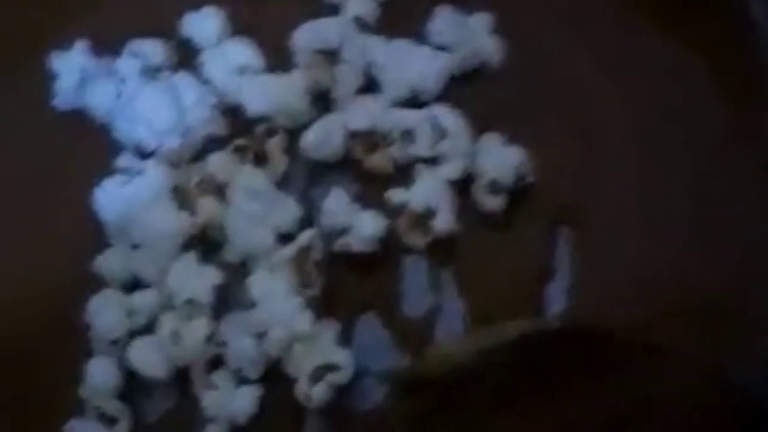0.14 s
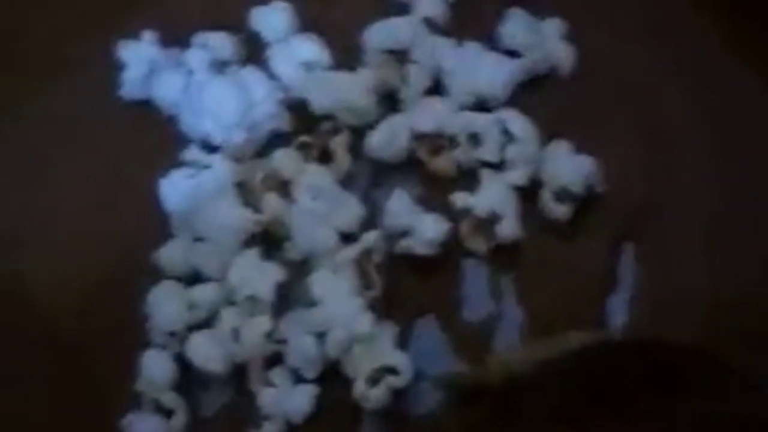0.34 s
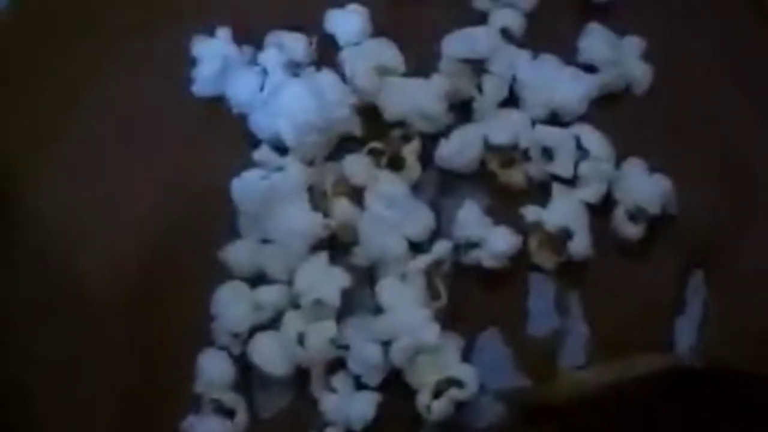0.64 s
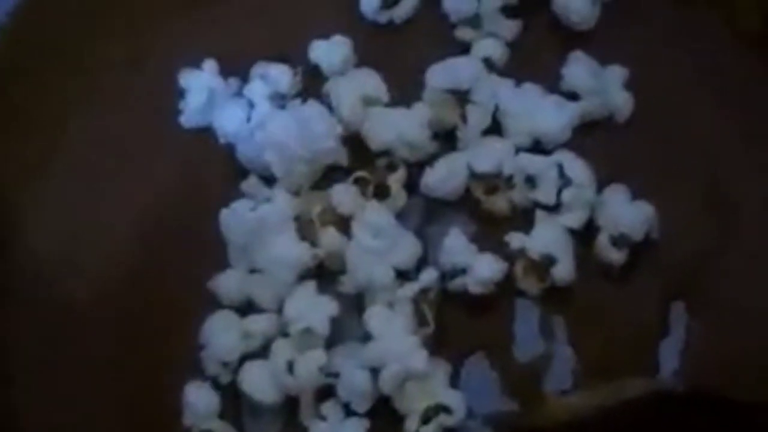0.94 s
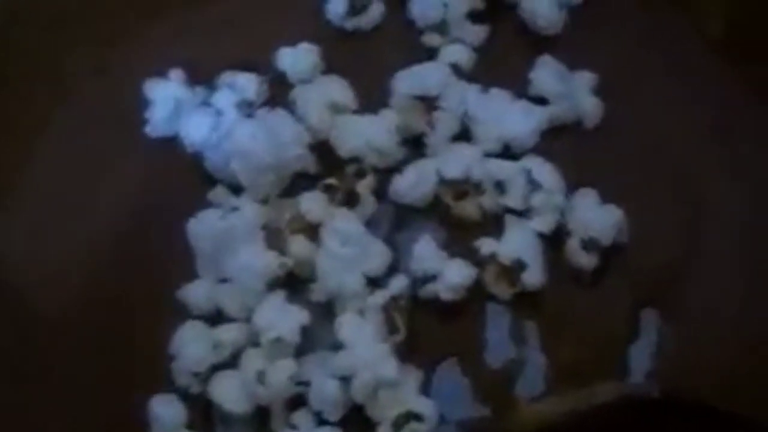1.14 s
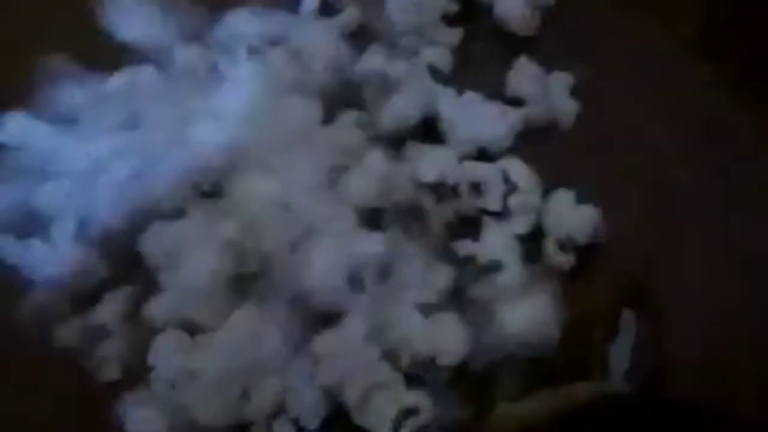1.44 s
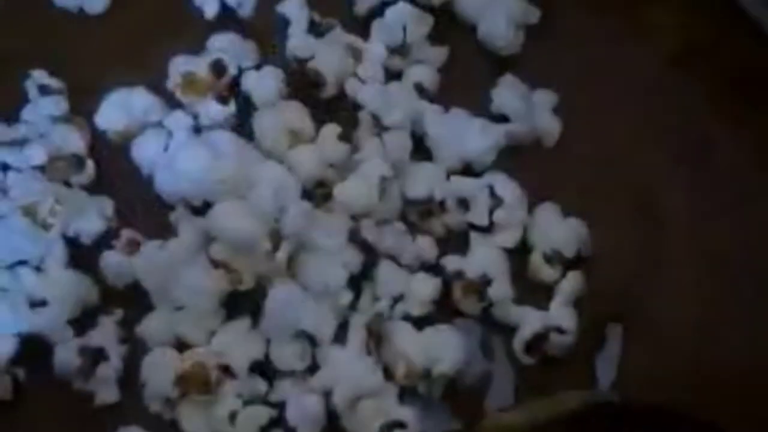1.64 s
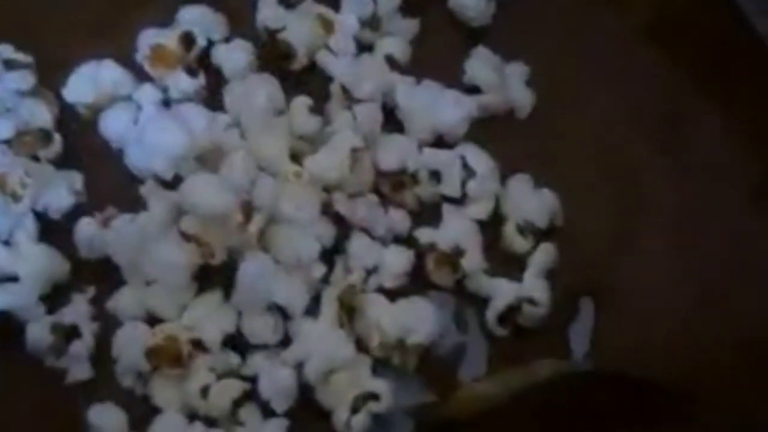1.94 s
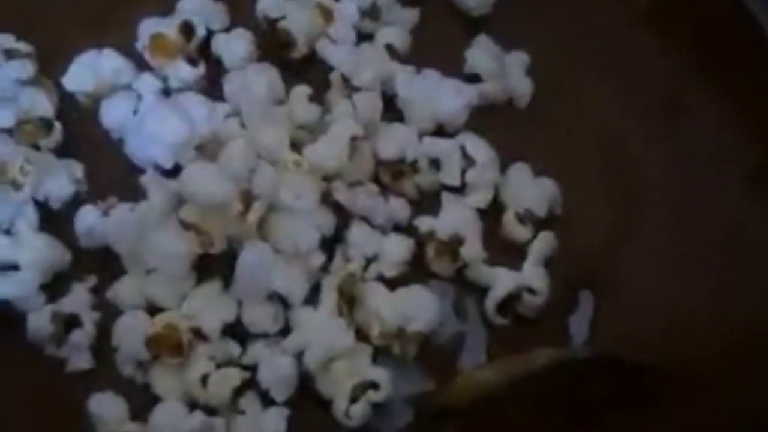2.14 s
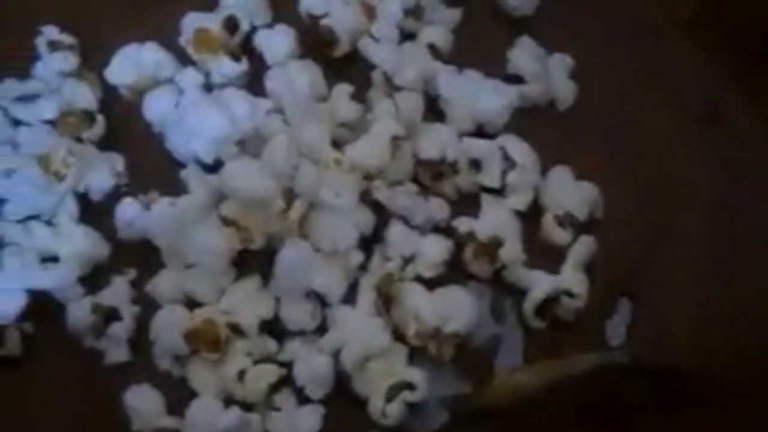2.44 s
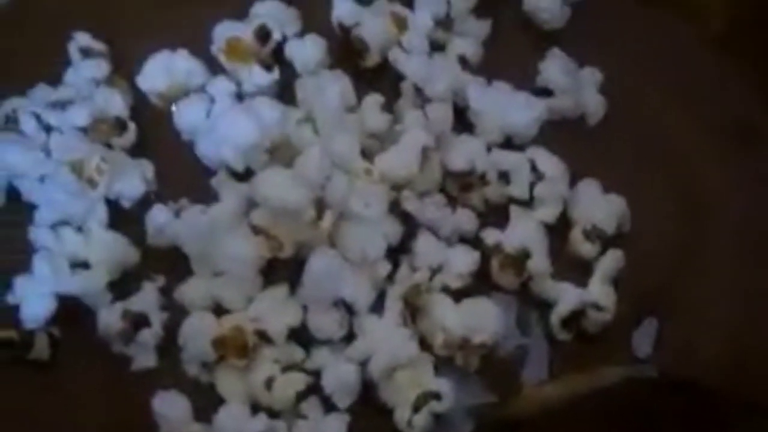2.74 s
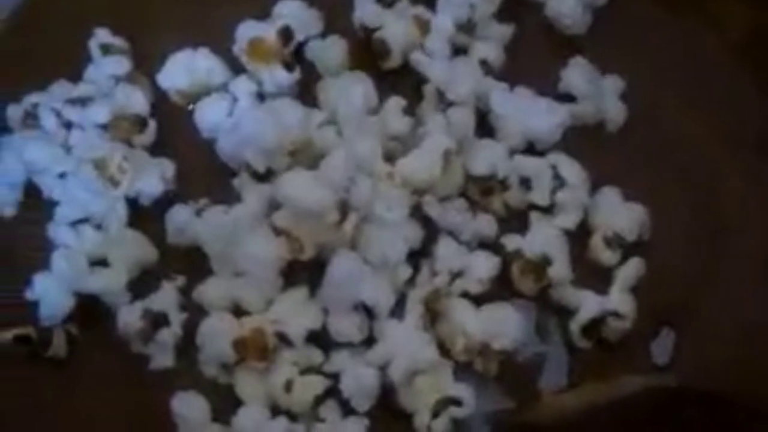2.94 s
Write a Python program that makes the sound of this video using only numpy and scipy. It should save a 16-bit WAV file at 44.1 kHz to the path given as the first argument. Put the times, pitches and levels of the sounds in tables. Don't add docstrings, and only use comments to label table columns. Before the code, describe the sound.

Popcorn and hard kernels rattle, click and scrape in a thin metal pot, a heap thumps softly into a hollow bowl, then a second rattle follows; quiet kitchen, close, dull, hissy small microphone.

```python
import sys
import numpy as np
from scipy import signal
from scipy.fft import rfft, irfft
from scipy.io import wavfile
from scipy.ndimage import uniform_filter1d

SR = 44100
rng = np.random.default_rng(int(sys.argv[2]) if len(sys.argv) > 2 else 0)


def transcribe(signal):
    frames = np.atleast_2d(signal).T
    limited = np.clip(frames, -1, 1)
    pcm = np.round(limited * 32767).astype(np.int16)
    wavfile.write(sys.argv[1], SR, pcm)


def ratio_of_db(decibels):
    return 10 ** (np.asarray(decibels, float) / 20)


N = 136710

# t/s, wall rattle level/dB, belly drag level/dB
SHAKING_PASSES = [
    [(.13, -72, -75), (.17, -59.5, -78), (.25, -51.5, -53), (.44, -53.5, -51), (.7, -55.5, -54),
     (.94, -56.5, -59.5), (1.02, -65.5, -60), (1.12, -70.5, -65), (1.35, -70.5, -79)],
    [(1.87, -81, -87), (1.92, -59.5, -62), (2.03, -57.5, -63), (2.2, -57.5, -62), (2.37, -53, -65),
     (2.5, -49, -43.5), (2.68, -56.5, -57), (2.86, -66.5, -60.5), (3.0, -87, -76.5)],
]
# t/s, peak level/dB, belly share/dB, chatter length/s, spot pitch f/Hz
KERNEL_STRIKES = [(0.166, -41.5, -10, 0.025, 4600), (0.198, -41.5, -3, 0.028, 3660),
                  (0.237, -39.5, 4.5, 0.049, 2370), (0.2666, -26, -7, 0.01, 2310),
                  (0.289, -29, -1.5, 0.012, 2360), (0.327, -43, 8, 0.021, 4500),
                  (0.3813, -34, 0, 0.025, 6500), (0.411, -33.5, -2.5, 0.019, 5100),
                  (0.5048, -35.5, -1.5, 0.041, 6230), (0.5754, -33, -10, 0.004, 6260),
                  (0.584, -37, -24, 0.0064, 6200), (0.604, -31, -8.5, 0.01, 2170),
                  (0.6227, -30.5, -2.5, 0.0056, 6130), (0.743, -41.5, -12, 0.022, 2330),
                  (0.769, -37, -11, 0.0049, 6300), (0.8626, -31.5, -5, 0.015, 6460),
                  (0.87, -30, -8, 0.015, 5260), (0.897, -33.5, -4.5, 0.035, 4650),
                  (1.038, -36.5, -2.5, 0.028, 5370), (1.095, -51.5, -5, 0.017, 4470),
                  (1.896, -49, -23, 0.028, 6100), (1.918, -43.5, -17, 0.03, 5250),
                  (1.941, -38, -9.5, 0.029, 3600), (1.986, -38, -1.5, 0.018, 4700),
                  (2.045, -38.5, -3.5, 0.023, 4840), (2.0654, -33.5, -13.5, 0.024, 4700),
                  (2.101, -32, -14.5, 0.0082, 4530), (2.145, -35.5, -4.5, 0.016, 6360),
                  (2.174, -40, -7.5, 0.029, 4600), (2.2343, -41.5, 2.5, 0.024, 2340),
                  (2.411, -37.5, -9, 0.021, 2330), (2.469, -36.5, 5, 0.016, 6420),
                  (2.503, -42, 0, 0.012, 4470), (2.54, -34.5, 1, 0.0026, 3460),
                  (2.5483, -27, -6.5, 0.016, 5400), (2.6292, -31, -9.5, 0.003, 5200),
                  (2.634, -32.5, -29, 0.0046, 5500), (2.7282, -36.5, 0.5, 0.003, 4000),
                  (2.779, -28, -10, 0.013, 5570), (2.788, -31, -12, 0.013, 5760)]
# t/s, peak level/dB, thud share/dB, thud pitch f/Hz, belly pitch f/Hz
BELLY_KNOCKS = [(.157, -53.5, -15, 253, 1150), (.222, -43.5, -13.5, 283, 1140),
                (.264, -31, -8.5, 258, 1040), (.27, -24.5, -21, 254, 1700), (.278, -33, -6.5, 262, 1050),
                (.29, -36, -4, 258, 1000), (.3, -38.5, -12, 250, 620), (.355, -37, -12.5, 258, 1020),
                (.43, -51, -0.5, 256, 625), (.83, -38.5, -46, 400, 840), (.915, -36.5, -18, 160, 1050),
                (.935, -38.5, -12.5, 160, 620), (1.9, -65, -26, 400, 1170), (2.07, -57.5, -5, 165, 684),
                (2.305, -47, -6, 316, 620), (2.392, -31, -10.5, 253, 1190), (2.4, -33, -12, 292, 573),
                (2.472, -43.5, -12, 163, 672), (2.545, -40, -8, 300, 1630),
                (2.592, -34.5, -23.5, 300, 1080), (2.62, -35.5, -23, 160, 620),
                (2.665, -36, -17, 300, 1080), (2.675, -37.5, -27, 400, 535), (2.79, -39.5, -25, 253, 626),
                (2.838, -42.5, -18, 307, 690)]
# t/s, peak level/dB, crackle share/dB, spot pitch f/Hz
BOWL_DROPS = [(.0985, -48.5, -34, 1440), (.101, -48.5, -34, 480), (.125, -58, -22, 1020),
              (1.434, -51, -4, 910), (1.443, -44, -6, 2500), (1.456, -38, -5, 1870),
              (1.464, -34, -12.5, 920), (1.468, -34, -28, 1390), (1.474, -37, -8, 920),
              (1.487, -36, -11, 910), (1.511, -40.5, -20, 940), (1.547, -45.5, -17, 1410),
              (1.567, -55, -8, 865), (1.612, -57, -22, 492), (1.653, -58.5, -7, 1400)]
# t/s, level/dB
HUM_LEVEL = [
    (.2, -83),
    (.45, -60),
    (1.1, -63),
    (1.3, -77.5),
    (1.9, -84),
    (1.97, -58),
    (2.33, -55),
    (2.93, -64.5),
    (2.97, -92),
]
# t/s, level/dB
AIR_NOTE_LEVEL = [
    (1.44, -70),
    (1.449, -44),
    (1.464, -43),
    (1.468, -54),
    (1.482, -43),
    (1.487, -54),
    (1.493, -44),
    (1.545, -53),
    (1.585, -72),
]
# t/s, level/dB
HAND_LEVEL = [
    (.1, -89),
    (.42, -67.5),
    (.6, -87),
    (.9, -92),
    (.95, -65),
    (1.02, -80),
    (2.34, -95),
    (2.4, -63),
    (3.05, -84),
]
# t/s, length/s, f/Hz, level/dB
KERNEL_SQUEAK = (.78, .035, 1800, -47)
# f/Hz, level/dB
BELLY_MODES = [(562, -1), (615, 5), (685, 2.5), (750, -2.5), (797, 1.5), (933, -0.5), (1010, 2.5),
               (1080, -2.5), (1157, 2), (1230, -1.5), (1400, -12.5), (1630, 1.5), (1700, -6), (1800, -4)]
# f/Hz, level/dB
WALL_MODES = [(2320, 2), (2436, -9.5), (3010, -3.5), (3320, -4), (3580, -2.5), (3870, -2.5), (4330, -4),
              (4600, -13.5), (4780, -1.5), (5110, -12.5), (5220, 0.5), (6030, -3.5), (6270, -2), (6480, -4)]
# f/Hz, level/dB
DENSE_WALL = [(250, -16), (520, -10.5), (1200, -2), (2000, -4), (2600, -7), (4400, -2), (6300, -5),
              (15500, -18.5)]
# f/Hz, level/dB
THUD_MODES = [(120, -7), (160, 2.5), (253, 4), (310, -4.5), (420, 3.5)]
# f/Hz, level/dB
BOWL_MODES = [(465, -5), (515, -5.5), (750, -5), (865, -5.5), (910, -1.5), (945, -3.5), (1000, -6),
              (1362, -12), (1418, 0), (1855, 0.5), (2065, -9), (2280, -29), (2500, -5.5), (2850, -29)]
BOWL_DECAY = [0.18, 0.17, 0.055, 0.08, 0.049, 0.065, 0.087, 0.13, 0.045, 0.032, .05, 0.055, .05, 0.039]
# f/Hz, level/dB
HISS_SPECTRUM = [(25, 12), (60, 3), (150, -0.5), (420, -5.5), (1000, -7.5), (2200, -4), (5000, -2.5),
                 (15700, -4)]
# f/Hz, level/dB
MICROPHONE_RESPONSE = [(25, -13), (110, -4.5), (400, -1), (6600, -0.5), (7300, -9), (8200, -15.5),
                       (15500, -11.5)]
# f/Hz, level/dB
GRIT_SPECTRUM = [(1760, -78), (3000, -51), (5870, -17), (7180, -19), (11500, -15), (15700, -13)]

BELLY_T60, WALL_T60, THUD_T60, DENSE_T60, TICK_T60 = 0.096, 0.073, 0.14, 0.055, 0.007
FOCUS_DB, WALL_FOCUS_DB, FOCUS_OCTAVES = 9.5, 7.5, 0.17


def read(points, hz):
    f, value = np.transpose(points)
    return np.interp(np.log(hz + 1), np.log(f + 1), value)


def evened(x):
    return x / np.sqrt(np.mean(x ** 2) + 1e-20)


def peaked(x):
    return x / (abs(x).max() + 1e-12)


def add(mix, s, sound):
    part = mix[round(s * SR):][:len(sound)]
    part += sound[:len(part)]


def curve(rows):
    s, db = np.transpose(rows)
    return ratio_of_db(np.interp(np.arange(N) / SR, s, db, left=-140, right=-140))


def coloured(x, table):
    return irfft(rfft(x) * ratio_of_db(read(table, np.fft.rfftfreq(N, 1 / SR))), N)


def near(modes, hz, boost_db):
    def closeness(f):
        return np.exp(-(np.log2(f / hz) / FOCUS_OCTAVES) ** 2)
    return [(f, db + boost_db * closeness(f)) for f, db in modes]


def ring(modes, t60, size=9000):
    hz, db = np.transpose(modes)[:, :, None]
    t = np.arange(size) / SR
    luck = rng.standard_normal((2, len(modes), 1))
    share_db = 3.5 * luck[0].clip(-2, 1.5)
    fall_db = 60 * t / np.reshape(t60, (-1, 1)) * (hz / hz.min()) ** 0.35
    x = (ratio_of_db(db + share_db - fall_db) * np.sin(2 * np.pi * hz * t + 9 * luck[1])).sum(0)
    rise = (t * hz.min() / 1000 / 0.0012).clip(0, 1)
    return x * np.sin(np.pi / 2 * rise) ** 2


def wall(spot_hz=1, size=6000):
    t, hz = np.arange(size) / SR, np.fft.rfftfreq(size, 1 / SR)
    spots_db = 1.5 * evened(uniform_filter1d(rng.standard_normal(len(hz)), size=80))
    dense = irfft(rfft(rng.standard_normal(size)) * ratio_of_db(read(DENSE_WALL, hz) + spots_db), size)
    dense = evened(dense * (t / 0.0005).clip(0, 1))
    decay = ratio_of_db(-60 * t / DENSE_T60) + ratio_of_db(5 - 60 * t / TICK_T60)
    clear = peaked(ring(near(WALL_MODES, spot_hz, WALL_FOCUS_DB), WALL_T60, size=size))
    return clear + ratio_of_db(3) * dense * decay * 0.5


def grains(per_s, spread_db, size):
    u = rng.random((size, 3))
    hit = u[:, 0] < per_s / SR
    return hit * np.sign(u[:, 1] - 0.5) * ratio_of_db(-spread_db * np.log(u[:, 2] * 0.47 + 0.014))


def stream(column, per_s, spread_db, bodies):
    level = sum(curve(np.array(rows)[:, [0, column]]) for rows in SHAKING_PASSES)
    out = np.zeros(N)
    for body in bodies:
        taps = grains(per_s / len(bodies), spread_db, size=N)
        out += signal.oaconvolve(evened(taps) * level, body / np.linalg.norm(body))[:N]
    return out / np.sqrt(len(bodies))


def shaking():
    bellies = [ring(BELLY_MODES, BELLY_T60) + ratio_of_db(-35.5) * ring(THUD_MODES, THUD_T60) for _ in range(8)]
    rattle = stream(1, 980, 3.2, [wall() for _ in range(8)])
    drag = stream(2, 900, 5.0, bellies)
    return rattle + drag


def strikes():
    out, t = np.zeros(N), np.arange(4000) / SR
    for s, db, belly_db, length, spot_hz in KERNEL_STRIKES:
        drive = ratio_of_db(-20) * grains(1200, 3.0, size=4000) * np.exp(-(t - length).clip(0) / 0.006)
        drive[0] = 1
        body = wall(spot_hz)
        hz = np.fft.rfftfreq(len(body), 1 / SR).clip(800, 16000)
        tilt_db = -0.51 * (belly_db + 3.0) * np.log2(hz.clip(0, 5000) / 5000)
        bump_db = 2.15 * np.exp(-(np.log2(hz / spot_hz) / 0.35) ** 2)
        top_fall_db = 13.5 * np.log2(hz / 10000).clip(0)
        body = irfft(rfft(body) * ratio_of_db(tilt_db + bump_db - top_fall_db), len(body))
        belly = ring(BELLY_MODES, BELLY_T60, size=6000)
        add(out, s, ratio_of_db(db + 2) * peaked(signal.fftconvolve(drive, body)))
        add(out, s, ratio_of_db(db + belly_db - 9.0) * peaked(signal.fftconvolve(drive, belly)))
    return out


def knocks():
    out = np.zeros(N)
    for s, db, thud_db, thud_hz, belly_hz in BELLY_KNOCKS:
        low = [(f, d - 14.0 * abs(np.log2(f / thud_hz))) for f, d in THUD_MODES]
        belly = peaked(ring(near(BELLY_MODES, belly_hz, FOCUS_DB), BELLY_T60))
        thud = peaked(ring(low, THUD_T60))
        add(out, s, ratio_of_db(db) * (belly + ratio_of_db(thud_db) * thud))
    return out


def hum():
    modes = [BELLY_MODES[1], (BELLY_MODES[2][0], BELLY_MODES[1][1] - 2), BELLY_MODES[8]]
    touches = signal.oaconvolve(grains(500, 4.0, size=N), ring(modes, BELLY_T60 * 0.7))[:N]
    return evened(touches) * curve(HUM_LEVEL)


def squeak():
    s, length, hz, db = KERNEL_SQUEAK
    out, t = np.zeros(N), np.arange(round(length * SR)) / SR
    add(out, s, ratio_of_db(db) * np.sin(np.pi * t / length) * np.sin(2 * np.pi * hz * t))
    return out


def bowl():
    out, t = np.zeros(N), np.arange(3000) / SR
    crisp = signal.butter(2, [1000, 8000], "bandpass", fs=SR, output="sos")
    for s, db, bright_db, spot_hz in BOWL_DROPS:
        crumbs = grains(3000, 0.75, size=3000) * np.exp(-t / 0.0083)
        crackle = peaked(signal.sosfilt(crisp, crumbs))
        add(out, s, ratio_of_db(db + 1.5) * peaked(ring(near(BOWL_MODES, spot_hz, FOCUS_DB), BOWL_DECAY)))
        add(out, s, ratio_of_db(db + bright_db + 9.5) * crackle)
    return out


def bowl_air():
    return curve(AIR_NOTE_LEVEL) * np.sin(2 * np.pi * 465 * np.arange(N) / SR)


def hand():
    rumble = [(20, -18), (50, -22), (110, 1.5), (200, -11), (400, -58)]  # f/Hz, level/dB
    return evened(coloured(rng.standard_normal(N), rumble)) * curve(HAND_LEVEL)


def kitchen(x):
    t60 = 0.27
    t = np.arange(round(0.5 * SR)) / SR
    noise = rng.standard_normal(len(t)) * (t > 0.004)
    low = signal.lfilter([0.2], [1, -0.8], noise)
    tail = low * ratio_of_db(-60 * t / t60) + 0.48 * (noise - low) * ratio_of_db(-60 * t / (1.57 * t60))
    return ratio_of_db(-10.5) * signal.fftconvolve(x, tail / np.linalg.norm(tail))[:N]


def hiss():
    z = signal.stft(evened(coloured(rng.standard_normal(N), HISS_SPECTRUM)), nperseg=512)[2]
    patches = uniform_filter1d(rng.standard_normal(z.shape), size=30, axis=0)
    patches = evened(uniform_filter1d(patches, size=25, axis=1))
    return ratio_of_db(-64) * signal.istft(z * ratio_of_db(1.57 * patches), nperseg=512)[1][:N]


def scene():
    dry = shaking() + strikes() + knocks() + hum() + squeak() + bowl() + bowl_air()
    return np.tile(dry + kitchen(dry) + hiss() + hand(), (2, 1))


def band_limit(x):
    return signal.sosfilt(signal.butter(12, 15860, fs=SR, output="sos"), x)


def record(dry):
    edge_hz = 15800
    edge = [(edge_hz, MICROPHONE_RESPONSE[-1][1]), (edge_hz + 90, -70)]
    heard = coloured(dry, list(MICROPHONE_RESPONSE[:-1]) + edge)
    power = uniform_filter1d(np.diff(heard[0], prepend=0) ** 2, size=1500) + 1e-14
    level = power ** (0.4 / 2)
    grit = coloured(rng.standard_normal(N), [(1500, -67.0)] + list(GRIT_SPECTRUM)) * level
    fizz_spectrum = [(6500, -54), (8000, 0), (10500, 4), (13000, -18)]  # f/Hz, level/dB
    fizz = evened(coloured(rng.standard_normal(N), fizz_spectrum) * level)
    opposed = evened(grit) * np.array([[1], [-1]])
    return band_limit(heard + ratio_of_db(-81) * fizz + ratio_of_db(-86) * opposed)


dry = scene()
out = record(dry)
transcribe(out)
```